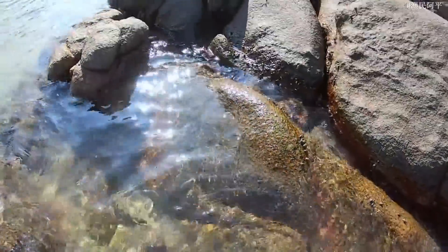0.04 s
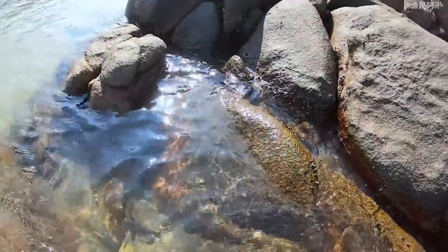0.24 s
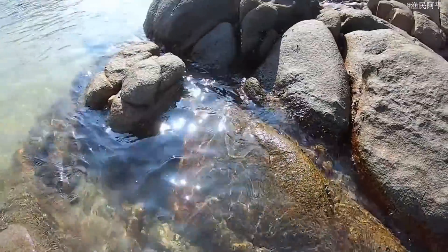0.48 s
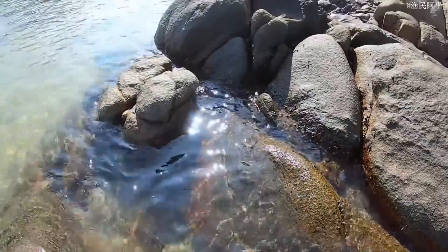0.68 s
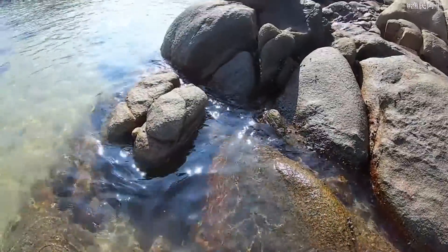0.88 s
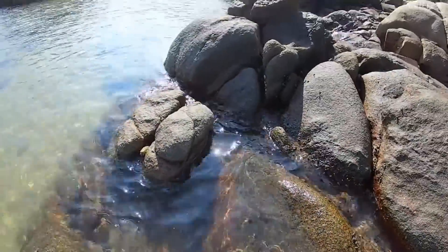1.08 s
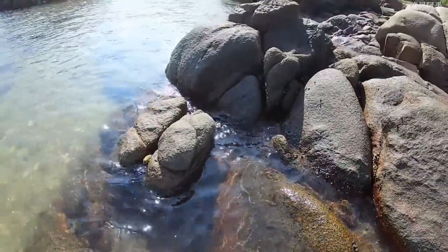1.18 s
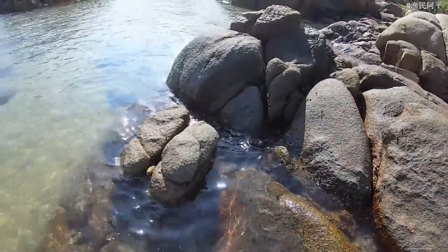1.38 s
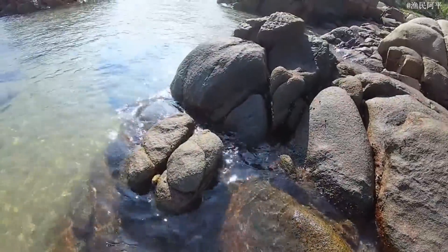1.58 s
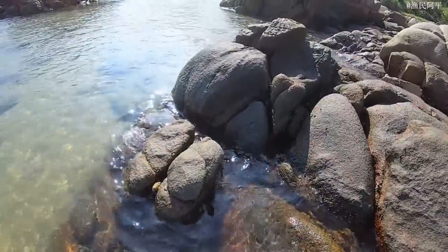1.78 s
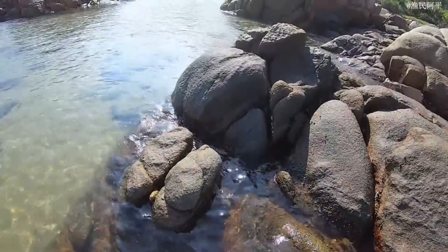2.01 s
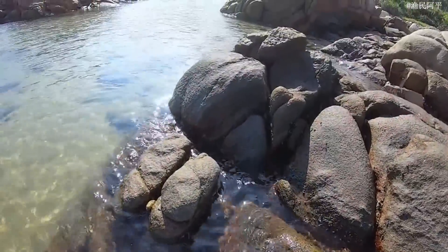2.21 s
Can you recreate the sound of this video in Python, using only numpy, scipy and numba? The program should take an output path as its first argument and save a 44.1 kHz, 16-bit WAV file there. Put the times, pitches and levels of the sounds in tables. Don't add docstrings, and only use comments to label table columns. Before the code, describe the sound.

After a faint drip and wind rumble, a hollow plastic pail knocks loudly and its contents rattle, fading within a second; then shallow water slaps and trickles between rocks, close and outdoors on a windy handheld microphone.

```python
import sys
import numpy as np
from scipy import signal
from scipy.fft import rfft, irfft, next_fast_len
from scipy.io import wavfile
from scipy.ndimage import uniform_filter1d
from numba import njit

SR = 44100
rng = np.random.default_rng(int(sys.argv[2]) if len(sys.argv) > 2 else 0)


def boost_factor(decibels):
    exponent = np.asarray(decibels, float) / 20
    return 10 ** exponent


def wav_record(signal):
    frames = np.transpose(np.atleast_2d(signal))
    bounded = np.clip(frames, -1, 1)
    quanta = np.round(bounded * 32767).astype(np.int16)
    wavfile.write(sys.argv[1], SR, quanta)


N = 99225


@njit
def svf(x, hz, width):
    y, band, low = np.empty(len(x)), 0., 0.
    g, k = np.tan(np.pi * hz / SR), width / hz
    for i in range(len(x)):
        v = (band + g * (x[i] - low)) / (1 + g * (g + k))
        band, low, y[i] = 2 * v - band, low + 2 * g * v, k * v
    return y


def svf_twice(x, hz, width):
    return svf(svf(x, 1. * hz, 1. * width), 1. * hz, 1. * width)


def unit(x):
    return x / np.sqrt(np.mean(x ** 2))


def table(rows, x, log=False):
    a, b = np.array(rows).T
    if log:
        return np.interp(np.log(x + 1), np.log(a + 1), b)
    return np.interp(x, a, b)


def walk(rate):
    k = int(SR / rate)
    steps = np.repeat(rng.standard_normal(N // k + 1), k)
    return 1.33 * uniform_filter1d(uniform_filter1d(steps, k), k)[:N]


def add(out, at, x):
    i = max(int(at * SR), 0)
    out[i:i + len(x)] += x[:max(N - i, 0)]


def fall(t, t60):
    return np.exp(-np.log(1000) * t / max(t60, .003))


def booms():
    # (time [s], pitch [Hz], level [dB], free ringing [s])
    wall_blows = [(0.222, 286, -22.5, .015), (0.2544, 225.4, -16, 0.014), (0.2708, 262, -6.5, 0.012),
                  (.27, 111, -22.5, 0.022), (0.2961, 247.4, -5, 0.025), (.305, 99, -23.5, 0.022),
                  (.325, 239, -27, 0.034), (.387, 257.7, -15, 0.03), (0.443, 229.6, -19.5, 0.013),
                  (.487, 286, -25, 0.009), (.528, 279.4, -27, 0.029), (0.561, 269, -29.5, .025),
                  (.605, 274, -33, 0.0086), (.665, 229, -33, 0.021), (0.694, 243, -32, 0.0083),
                  (0.973, 292, -40.5, 0.011), (1.09, 290, -45, 0.017), (1.844, 328, -41.5, 0.0094),
                  (1.878, 61, -19, 0.015), (2.226, 304, -28.5, 0.0069)]
    free_t60, damped_t60, rise_s = 0.31, 0.043, 0.00065
    wander, partner_ratio, partner_db = 0.023, 1.24, -11.5
    out, t, drift = np.zeros(N), np.arange(SR // 5) / SR, walk(60)
    for at, hz, db, ring in wall_blows:
        pitch = hz * (1 + wander * np.resize(drift[int(at * SR):], len(t)))
        phase = 2 * np.pi * np.cumsum(pitch) / SR
        env = (1 - np.exp(-t / rise_s)) * fall(t, free_t60)
        env = env * fall(np.maximum(t - ring, 0), damped_t60)
        modes = np.sin(phase) + boost_factor(partner_db) * np.sin(partner_ratio * phase)
        add(out, at, boost_factor(db) * env * modes)
    return out


def hits(rows, body, broad_db, thud_db):
    # (centre [Hz], width [Hz], level [dB])
    crack_modes = [(3600, 920, 4), (5670, 590, 5.5), (6520, 1190, 9.5), (7780, 870, 6.5), (9880, 500, 6.5),
                   (13400, 1100, 2.5), (15200, 600, 7)]
    rise_s, snap, snap_t60 = 0.00087, 2.05, 0.0049
    tick_db, grit_db = 8, 2
    low, high, dull = np.zeros(N), np.zeros(N), np.zeros(N)
    t = np.arange(SR // 8) / SR
    rise = (1 - np.exp(-t / rise_s)) * (1 + snap * fall(t, snap_t60))
    for at, db, treble_db, t60 in rows:
        add(low, at, boost_factor(db) * rise * fall(t, t60))
        add(high, at, boost_factor(db + treble_db + 2.5) * rise * fall(t, 0.6 * t60))
        add(dull, at, boost_factor(db - 0.29 * treble_db + thud_db) * rise * fall(t, t60))

    def grit():
        return rng.standard_normal(N) * boost_factor(grit_db * walk(300))

    def tick(env):
        return boost_factor(tick_db) * np.maximum(np.diff(env, prepend=0), 0) * rise_s * SR / 8

    blow = low * grit() + tick(low)
    bright = high * grit()
    soft = dull * grit()
    ring = sum(boost_factor(db) * svf(blow, 1. * f, 1. * w) * np.sqrt(1000 / w) for f, w, db in body)
    broad = boost_factor(broad_db) * svf_twice(svf(blow, 1060.0, 3200.0), 1550, 3360)
    crack = sum(boost_factor(db) * svf_twice(bright, f, 2.18 * w) for f, w, db in crack_modes)
    thud = svf_twice(soft, 556, 970)
    return ring + broad + crack + thud


def rattles():
    # (time [s], peak [dB], treble against it [dB], t60 [s])
    strikes = [(0.0812, -50.5, 5, 0.093), (0.1745, -50.5, 9, 0.087), (0.2197, -18, 2, 0.089),
               (0.246, -22.5, -1, 0.033), (0.2668, -14.5, -20.5, 0.08), (0.2764, -27, -4, 0.044),
               (0.2952, -17, -27, 0.062), (0.3054, -14.5, -26, 0.05), (0.2925, -16, -28, 0.02),
               (0.368, -33.5, -37, 0.036), (0.384, -24.5, -47.5, 0.044), (0.4384, -28.5, -60.5, 0.054),
               (0.4648, -18, -22, 0.046), (0.4813, -19.5, -1.5, 0.022), (0.503, -26.5, -43, 0.032),
               (0.5257, -15.5, -7, 0.05), (0.5546, -32, -11, 0.042), (0.5813, -19.5, -31, 0.017),
               (0.6175, -32, -41, 0.034), (0.6528, -24.5, -13, 0.056), (0.661, -34, 0.5, 0.052),
               (0.6774, -26.5, -15, 0.093), (0.7017, -36.5, -9, 0.13), (0.742, -34.5, -39, 0.033),
               (0.77, -34, -33, 0.04), (0.8001, -32.5, -7, 0.098), (0.842, -34.5, -10, 0.04),
               (0.8916, -35, -6.5, 0.055), (0.9665, -37, -12, 0.037)]
    # (centre [Hz], width [Hz], level [dB])
    pail_modes = [(746, 48, -5.5), (917.6, 17, -3), (1150, 73, -1), (1390, 110, -5.5), (1650, 130, -9),
                  (2800, 170, -38)]
    return boost_factor(-2.5) * hits(strikes, pail_modes, 0.32, -1)


def hollow(t):
    # (centre [Hz], width [Hz], level [dB])
    cavity_modes = [(150, 33, -16), (231.4, 61, 0), (289, 21, -1.5), (377, 31, -14.5)]
    # (time [s], level [dB])
    shaking = [
        (0.05, -59),
        (.21, -57),
        (.23, -37),
        (.33, -36.5),
        (.45, -31),
        (.62, -39.5),
        (.72, -43.5),
        (.78, -46),
        (1., -62.5),
        (1.15, -92),
    ]
    push = rng.standard_normal(N) * boost_factor(2 * walk(39.56))
    murmur = sum(boost_factor(db) * svf(svf(push, 1. * f, 1. * w), 1. * f, 4.0 * w) for f, w, db in cavity_modes)
    return boost_factor(table(shaking, t)) * unit(murmur)


def slaps():
    # (time [s], peak [dB], treble against it [dB])
    splashes = [(1.0536, -49, -22), (1.0864, -32.5, -29), (1.134, -50, 7), (1.2768, -30.5, -13.5),
                (1.3368, -27.5, -23), (1.3813, -34.5, -16.5), (1.399, -57, -1), (1.4052, -31, -18),
                (1.4393, -45, 0), (1.4501, -36, -22), (1.508, -39, -18), (1.5714, -41, -17),
                (1.627, -46, -7), (1.8343, -35.5, -26), (1.893, -39.5, -3), (1.949, -37.5, -15),
                (1.9739, -30.5, -19.5), (1.997, -34, -20), (2.016, -35, -17), (2.0402, -30.5, -20),
                (2.0597, -28.5, -22.5), (2.098, -38, -15), (2.224, -31.5, -27)]
    t60_s = 0.046
    return hits([(*s, t60_s) for s in splashes], [], 1.7, -1.1)


def knocks():
    return rattles() + slaps()


def bubble(hz, cycles, glide):
    t = np.arange(int(cycles / hz * SR)) / SR
    ring = np.sin(2 * np.pi * hz * t * (1 + glide * t / t[-1]))
    return ring * fall(t, cycles / hz) * np.minimum(t * hz / 3, 1)


def drops():
    # (time [s], peak [dB], pitch [Hz])
    droplets = [(.009, -37, 1945), (0.247, -20, 1860), (0.0837, -37.5, 4820), (.2675, -20.5, 933),
                (.385, -27.5, 920), (.482, -25.5, 3530), (.527, -23, 3150), (.583, -31, 1400),
                (.679, -29, 5150), (.706, -40, 7600), (.8714, -51, 3170), (1.067, -39.5, 4200),
                (1.087, -35.5, 1240), (1.094, -40, 2960), (1.213, -39.5, 4100), (1.231, -46, 3050),
                (1.238, -41.5, 2900), (1.242, -43.5, 1980), (1.266, -47, 3600), (1.279, -36, 1350),
                (1.308, -48, 3800), (1.32, -52, 3700), (1.338, -35.5, 2305), (1.34, -41, 5300),
                (1.382, -41, 1250), (1.405, -36, 3140), (1.413, -40.5, 1286), (1.423, -42.5, 1260),
                (1.436, -40, 4680), (1.456, -43, 2980), (1.487, -40, 3680), (1.518, -47, 2710),
                (1.778, -35.5, 1550), (1.857, -42, 1960), (1.87, -37.5, 2120), (1.877, -41, 4020),
                (1.885, -49, 1690), (1.94, -41.5, 1920), (1.948, -36, 1590), (1.955, -45, 3100),
                (1.961, -39.5, 1084), (1.974, -38.5, 2300), (1.978, -35, 1390), (1.994, -46, 4600),
                (1.998, -36, 1650), (2.04, -40.5, 2300), (2.049, -39.5, 1470), (2.061, -32.5, 2630),
                (2.063, -41, 3600), (2.083, -43.5, 2730), (2.098, -36.5, 1930), (2.134, -42, 3400),
                (2.146, -50, 1910), (2.161, -38.5, 4020), (2.17, -36, 2950), (2.238, -35.5, 2000),
                (2.243, -36, 2180)]
    out = np.zeros(N)
    for at, db, hz in droplets:
        add(out, at, boost_factor(db + 9.5) * bubble(hz, 30.4, 0.052))
    return out


def gurgles():
    # (time [s], level [dB], start pitch [Hz], end pitch [Hz], length [s])
    air_pockets = [(0.583, -24, 474, 1300, .012), (1.178, -37, 590, 987, 0.027),
                   (1.203, -37, 1020, 1150, 0.021), (1.249, -43, 1047, 1290, 0.029),
                   (1.297, -33.5, 1300, 1420, 0.0078), (1.449, -36.5, 1150, 1010, 0.013),
                   (2.022, -38.5, 464, 630, 0.068), (2.066, -41, 700, 760, 0.019),
                   (2.076, -38.5, 515, 475, 0.023), (2.111, -44, 498, 657, 0.03),
                   (2.134, -46.5, 856, 1010, 0.042), (2.165, -43, 1004, 1150, 0.05),
                   (2.157, -42, 660, 770, 0.068)]
    flutter = boost_factor(4 * walk(150))
    wobble = 1 + .07 * walk(200)
    out = np.zeros(N)
    for at, db, start_hz, end_hz, length in air_pockets:
        u = np.arange(int(length * SR)) / (length * SR)
        pitch = start_hz + (end_hz - start_hz) * u
        pitch = pitch * np.resize(wobble[int(at * SR):], len(u))
        sweep = np.sin(2 * np.pi * np.cumsum(pitch) / SR)
        add(out, at, boost_factor(db) * np.sin(np.pi * u ** .5) * sweep)
    return out * flutter


def trickle(flow):
    per_s, centre_hz, octaves, scatter_db, spray_db = 1250, 1300, 0.493, 3.5, -11.5
    bed, spray = np.zeros(N), np.zeros(N)
    count = int(per_s * N / SR)
    chance, spread = rng.random((count, 4)), rng.standard_normal(count)
    for (bed_at, strength, life, spray_at), g in zip(chance, spread):
        hz = np.clip(centre_hz * 2 ** (octaves * g * abs(g)), 300, 9000)
        size = boost_factor(-scatter_db * np.log(strength + 0.0082))
        weight = min(hz / 1000, 1) ** 2
        add(bed, bed_at * N / SR, size * weight * bubble(hz, 13 * (0.13 + life), 0.11))
        add(spray, spray_at * N / SR, size * bubble(min(2.8 * hz, 14000), 14, 0.1))
    return flow * (unit(bed) + boost_factor(spray_db) * unit(spray))


def stream(t):
    # (time [s], level [dB])
    flow_levels = [(0, -81), (.2, -106), (.3, -51.5), (.75, -52), (1.02, -59.5), (1.06, -51.5),
                   (1.3, -48.5), (1.46, -52.5), (1.5, -79), (1.75, -62), (1.86, -48), (1.98, -46),
                   (2.08, -50.5), (2.25, -52.5)]
    return boost_factor(table(flow_levels, t) + 3 * walk(45.27))


def ports(x, own):
    # (frequency [Hz], level against right [dB])
    shade = [(100, -2), (330, -2), (600, -10), (1300, -14), (2500, -10), (5000, -4), (9000, -5),
             (14000, -8)]
    lead_s, blur, rocks_db, rocks_t60 = .0001, boost_factor(2), -11, 0.084
    own_share = 0.86
    size = next_fast_len(N + SR // 2)
    f, t = np.arange(size // 2 + 1) * SR / size, np.arange(SR // 4) / SR
    above = f ** 2 / (f ** 2 + 600 ** 2)

    def echo(t60):
        tail = rng.standard_normal(len(t)) * fall(t, t60)
        return rfft(tail * np.sqrt(2 * np.log(1000) / t60 / SR), size) * above

    def heard(spectrum, gain):
        return irfft(spectrum * (gain + boost_factor(rocks_db) * echo(rocks_t60) * abs(gain)), size)[:N]

    right = rfft(x, size)
    left = right + own_share * above * (rfft(own, size) - right / 2)
    early = np.exp(2j * np.pi * f * lead_s)
    scattered = (early + blur * echo(0.035)) / np.sqrt(1 + (blur * above) ** 2)
    return np.array([heard(left, boost_factor(table(shade, f, True)) * scattered), heard(right, 1)])


def wind(t):
    # (time [s], level [dB])
    gust_levels = [(0, -39), (.06, -37), (.13, -43), (.2, -33.5), (.3, -43), (.42, -45), (.6, -63),
                   (.88, -67), (1.05, -47), (1.17, -56.5), (1.36, -53.5), (1.48, -41), (1.62, -41.5),
                   (1.78, -37.5), (1.85, -33.5), (1.89, -28.5), (1.95, -38.5), (2.05, -39), (2.18, -46)]
    rumble_top_hz, right_db, wind_db, tail_db = 54.8, -4.5, 5, -11
    low = signal.butter(4, [18, rumble_top_hz], "bandpass", fs=SR, output="sos")
    gust = table(gust_levels, t)

    def port():
        rumble = unit(signal.sosfilt(low, rng.standard_normal(N)))
        puff = unit(svf(svf(rng.standard_normal(N), 97.0, 47.0), 53.0, 52.0))
        puff = puff * boost_factor(tail_db + 0.66 * (gust + 36.0))
        return (rumble + puff) * boost_factor(2.5 * walk(22.98))

    return np.array([port(), port() * boost_factor(right_db)]) * boost_factor(gust + wind_db)


def surf(flow):
    # (frequency [Hz], band level [dB])
    hiss_colour = [(150, -8.5), (420, -1.5), (1320, -4), (3000, -12.5), (4840, -24.5), (6470, -2.5),
                   (9000, -21), (15500, -112)]
    surf_db, rush_db, port_db = -55, -10, -64
    hiss = 0
    for hz in 180 * 2 ** np.arange(0, 6.5, .5):
        pair = np.array([svf_twice(rng.standard_normal(N), hz, hz / 2) for _ in range(2)])
        hiss = hiss + boost_factor(table(hiss_colour, hz, True) + 2 * walk(18)) * pair
    port = np.array([unit(svf(rng.standard_normal(N), 6560., 370.)) for _ in range(2)])
    return unit(hiss) * (boost_factor(surf_db) + boost_factor(rush_db) * flow) + boost_factor(port_db) * port


def scene():
    t = np.arange(N) / SR
    flow = stream(t)
    close = boost_factor(2.5)
    near = close * (knocks() + drops() + gurgles() + trickle(flow))
    own = close * knocks()
    return ports(near + booms() + hollow(t), own) + wind(t) + surf(flow)


def roll_off(x):
    return signal.sosfilt(signal.butter(12, 16180, fs=SR, output="sos"), x)


def record(dry):
    top = signal.butter(3, 8570, fs=SR, output="sos")
    mix = signal.sosfilt(top, dry)
    return roll_off(mix)


dry = scene()
out = record(dry)
wav_record(out)
```